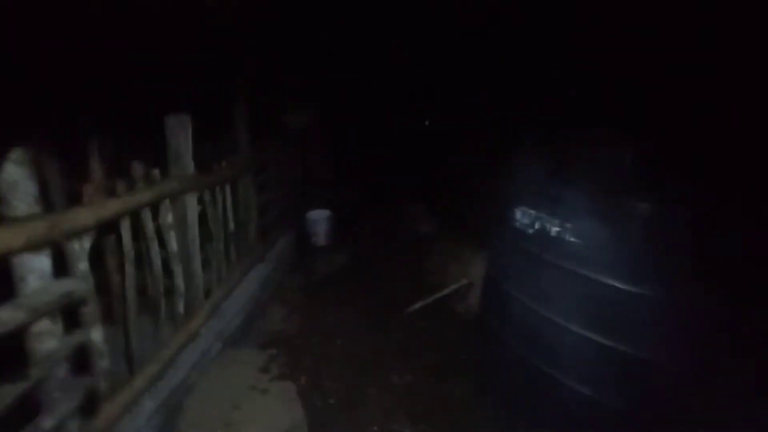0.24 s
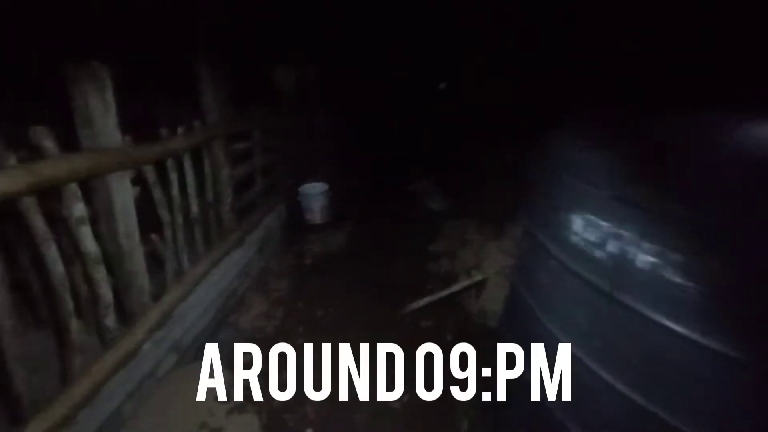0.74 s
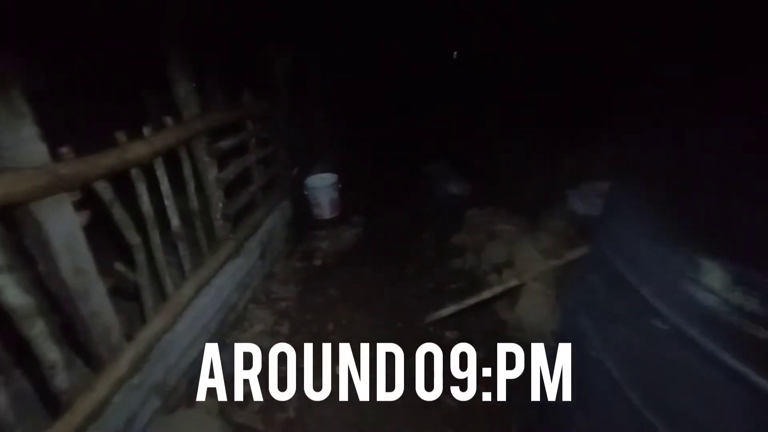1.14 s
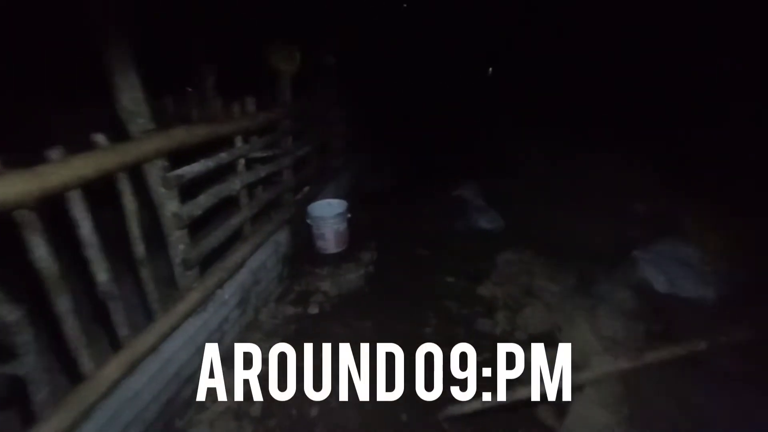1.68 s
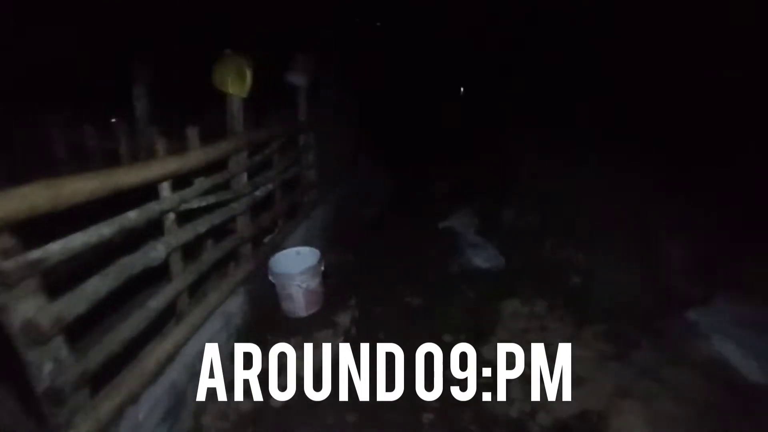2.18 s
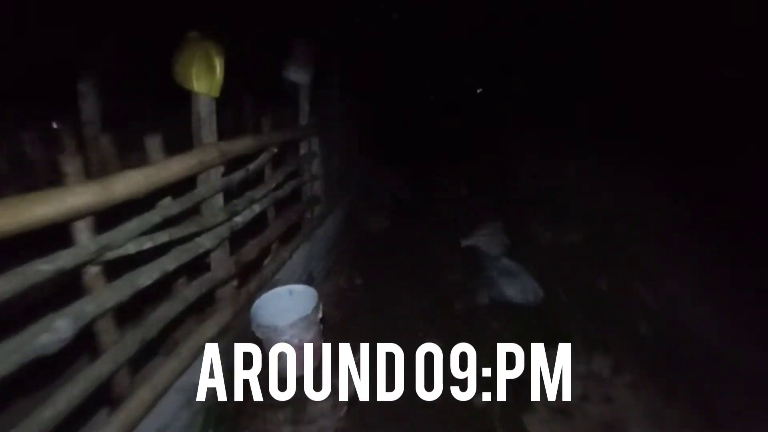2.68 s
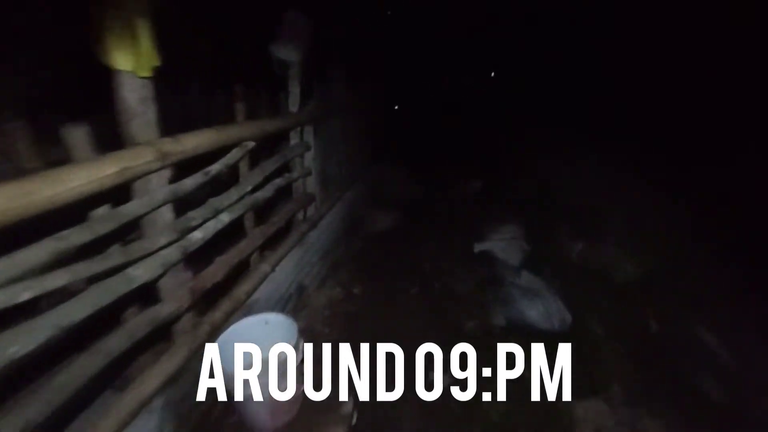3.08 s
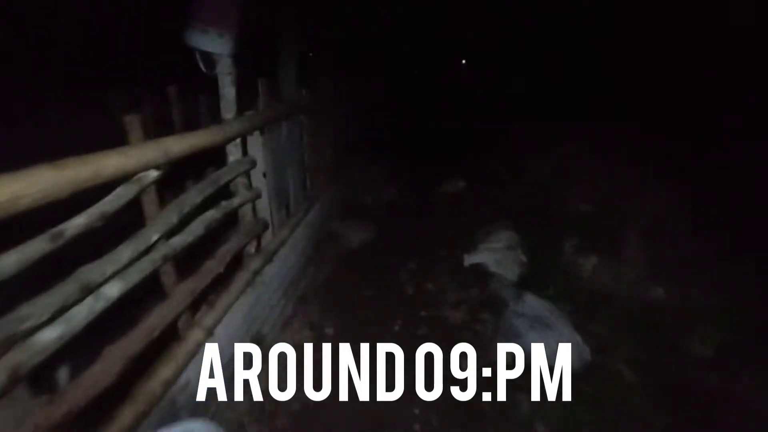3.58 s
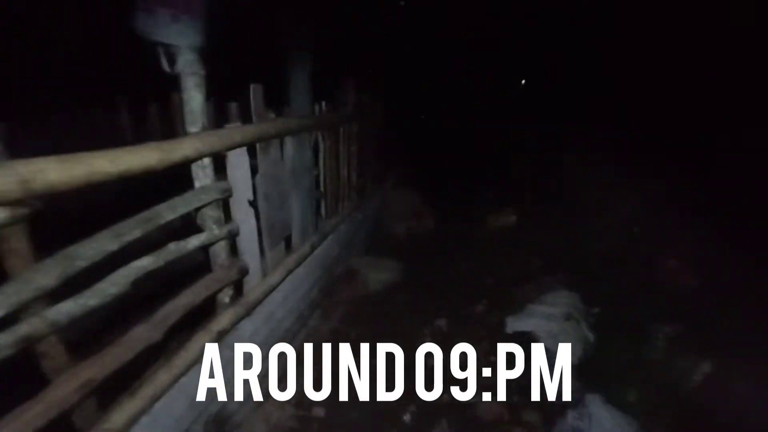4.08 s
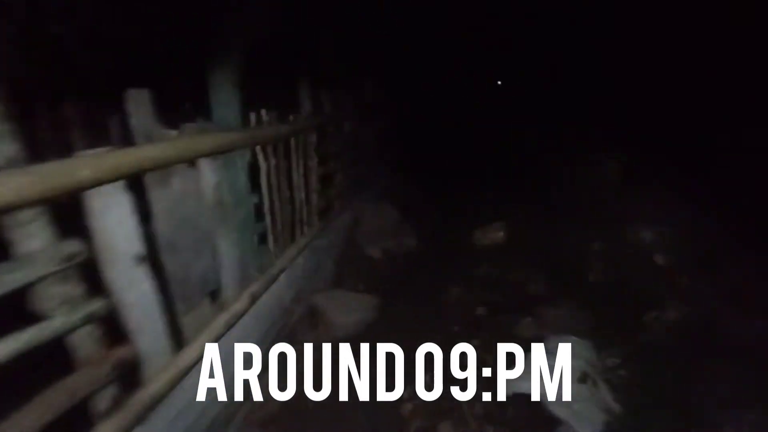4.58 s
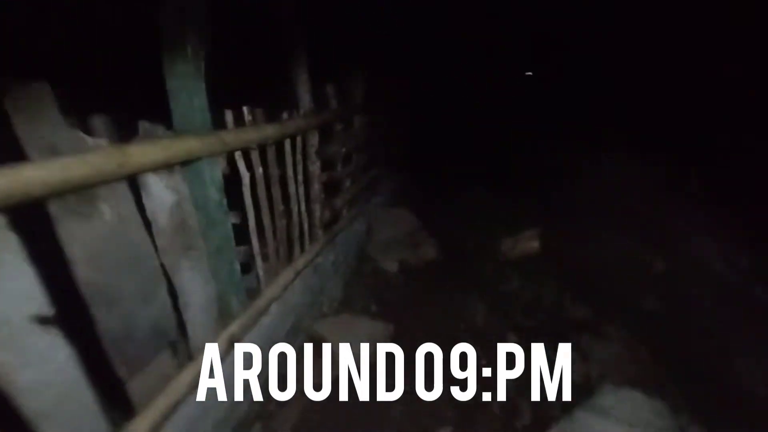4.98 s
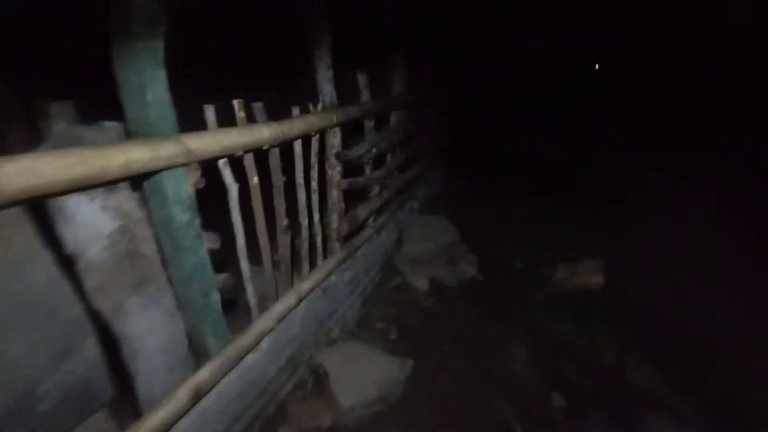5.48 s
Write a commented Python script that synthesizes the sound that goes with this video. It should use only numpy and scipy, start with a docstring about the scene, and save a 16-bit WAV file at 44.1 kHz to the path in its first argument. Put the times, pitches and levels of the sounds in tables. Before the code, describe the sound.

At night by a wooden pen, a pig snorts sharply and grunts at about one second, grunts again near 2.7, groans hoarsely at 3.3, then gives two stronger grunts near 3.8 and 4.9. Clicks and knocks crowd the first half while litter rustles. Crickets trill faintly throughout. Close handheld microphone, a very short echo.

```python
"""Sow in a night pen

A sow grunts, snorts and snuffles close up in a wooden pen, with crickets trilling all around.
Each grunt opens with a nasal hum, a wavering near-sine, and breaks into slow throat pulses: thumps and rasps
of noise through resonances. Puffs are noise ringing the snout; a hoarse groan is pulses half drowned in noise.
Knocks are short bursts on one ring, rustling litter is scattered pitched grains under a faint fizz of straw.
Crickets are blurred tones pulsed by wing strokes, over a bed of coloured noise."""
import sys
import numpy as np
from scipy import signal
from scipy.io import wavfile
from scipy.ndimage import uniform_filter1d

SR = 44100
rng = np.random.default_rng(int(sys.argv[2]) if len(sys.argv) > 2 else 0)


def materialize(psi):
    """Save the field psi as 16-bit PCM at rate SR to the path in sys.argv[1].

    A 1-D psi becomes a single channel; in a 2-D psi each row is a channel.
    """
    bounded = np.clip(np.atleast_2d(psi).T, -1, 1)
    quanta = np.round(bounded * 32767).astype(np.int16)
    wavfile.write(sys.argv[1], SR, quanta)


N = 253134
TIME = np.arange(N) / SR
FREQS = np.fft.rfftfreq(8192, 1 / SR)


def gain_of(db):
    """Decibels to amplitude."""
    return 10 ** (np.asarray(db) / 20)


def evened(x):
    """Scales to rms 1."""
    return x / np.sqrt(np.mean(x ** 2) + 1e-20)


def read(points, hz):
    """Reads a table on a log-frequency axis."""
    f, value = np.transpose(points)
    return np.interp(np.log(hz + 1), np.log(f + 1), value)


def follow(rows, t):
    """Reads every column of a curve at the times t."""
    s, *columns = np.transpose(rows)
    return [np.interp(t, s, c) for c in columns]


def add(mix, s, sound):
    """Mixes a sound in at s seconds."""
    part = mix[max(round(s * SR), 0):][:len(sound)]
    part += sound[:len(part)]


def wander(size, per_s):
    """Random drift of about unit size: straight lines between per_s random points a second."""
    return np.interp(np.arange(size) * per_s / SR, np.arange(4096), rng.standard_normal(4096))


def resonances(modes):
    """Gain of a set of resonances (f/Hz, width/Hz, level/dB), summed in power."""
    power = 0
    for hz, width, db in modes:
        # the factor makes width the span between the half-power points
        power = power + (gain_of(db) / (1 + ((FREQS - hz) / (.78 * width)) ** 2)) ** 2
    return np.sqrt(power)


def ring(x, gain):
    """Passes x through a causal, minimum-phase filter of this gain shape and unit energy."""
    log_gain = np.log(np.maximum(gain / gain.max(), 1e-5))
    mirrored = np.r_[log_gain, log_gain[-2:0:-1]]
    spectrum = np.exp(np.conj(signal.hilbert(mirrored)))
    response = np.fft.ifft(spectrum).real[:4096]
    return signal.fftconvolve(x, response / np.linalg.norm(response))[:len(x)]


def tilt(x, hz, kind):
    """A gentle low-pass or high-pass."""
    return signal.lfilter(*signal.butter(1, hz, kind, fs=SR), x)


def resonate(x, hz, width):
    """A resonance of gain 1 that follows the curve hz: shift down, smooth, shift back up."""
    turn = np.exp(2j * np.pi * np.cumsum(hz) / SR)
    r = np.exp(-np.pi * width / SR)
    smooth = signal.lfilter([(1 - r) ** 2], [1, -2 * r, r * r], x / turn)
    return 2 * (turn * smooth).real


# decay of the pen's echo: f/Hz, t60/s
PEN_DECAY = [(100, 0.23), (300, 0.23), (900, 0.23), (2000, 0.16), (6000, 0.13), (15000, 0.028)]


def pen(x, echo_db):
    """Rails and walls scatter the sound into a short tail that dies band by band."""
    t = np.arange(SR // 2) / SR
    scatter = rng.standard_normal(len(t)) * (t > .004)
    hz, s, z = signal.stft(scatter, SR, nperseg=256)
    z = z * gain_of(-60 * s / read(PEN_DECAY, hz)[:, None])
    tail = signal.istft(z, SR, nperseg=256)[1][:len(t)]
    return x + gain_of(echo_db) * signal.oaconvolve(x, tail / np.linalg.norm(tail))[:N]


def trill(hz, width_hz, strokes_per_s, depth):
    """Wing strokes pulse a narrow wing resonance; many scattered paths blur its pitch."""
    noise = rng.standard_normal(N) + 1j * rng.standard_normal(N)
    blur = signal.sosfilt(signal.butter(2, width_hz / 2, fs=SR, output="sos"), noise)
    blur = blur / np.sqrt(abs(blur) + 1e-12)  # evens out the swells
    stroke_rate = strokes_per_s * (1 + .06 * wander(N, 6.4))
    strokes = 1 + depth * np.cos(2 * np.pi * np.cumsum(stroke_rate) / SR)
    carrier = np.exp(2j * np.pi * np.cumsum(hz * np.ones(N)) / SR)
    return evened(strokes * (blur * carrier).real)


# colour of the far insects and air: f/Hz, level/dB
NIGHT_COLOUR = [(30, -26), (100, 20), (250, 18), (700, 1.5), (1800, -1), (3500, -6), (4400, 31.5),
                (5100, -67), (5800, -18.5), (6600, -32.5), (7300, -48.5), (8200, -11), (10000, -43),
                (14000, -17)]
CRICKET_HZ, CRICKET_DB = 4396, -63  # the steady crickets, before drift and swell
NEAR_HZ, NEAR_DB = 4195, -58  # the nearer cricket
FIRST_BOUT_S, BOUT_EVERY_S, BOUT_S = .76, 1.395, .42


def insects(night_db=-70, waver_db=2, swell_db=2):
    """Steady crickets, one that sings in regular bouts, a higher trill and the far chorus."""
    drift_hz, swells_per_s = 25, 6
    steady = gain_of(CRICKET_DB + swell_db * wander(N, swells_per_s))
    steady_hz = CRICKET_HZ + drift_hz * wander(N, swells_per_s)
    steady *= trill(steady_hz, width_hz=150, strokes_per_s=39, depth=.45)
    age = (TIME - FIRST_BOUT_S) % BOUT_EVERY_S
    bouts = gain_of(NEAR_DB) * np.clip(np.minimum(age, BOUT_S - age) / .025, 0, 1)  # 25 ms edges
    near = bouts * trill(NEAR_HZ, width_hz=120, strokes_per_s=57, depth=0.47)
    high = gain_of(-74 + waver_db * wander(N, 14))
    high = high * trill(6500, width_hz=480, strokes_per_s=48, depth=.3)
    night = gain_of(night_db) * ring(rng.standard_normal(N), gain_of(read(NIGHT_COLOUR, FREQS)))
    return steady + near + high + night


# scuffs in the litter: crest t/s, rise t/s, fall t/s, crackle level/dB, dry straw fizz level/dB
SCUFF_CUES = [ (.02, 0.035, 0.11, -53, -70), (.4, 0.089, 0.051, -53, -71), (.69, .22, 0.33, -55, -67.5),
              (.89, 0.094, 0.53, -55.5, -70.5), (1.2, 0.28, 0.18, -51.5, -69.5),
              (1.51, 0.36, 0.12, -61.5, -74), (1.73, 0.053, 0.12, -64, -72.5),
              (1.941, 0.065, .12, -56.5, -67), (2.38, 0.046, .15, -62.5, -79),
              (2.57, 0.093, 0.18, -55, -79), (2.83, .15, 0.24, -52, -69),
              (3.069, 0.071, 0.11, -60.5, -70.5), (3.273, .015, 0.025, -62, -80),
              (3.46, .04, 0.4, -63.5, -87), (4.048, .05, 0.17, -56, -77), (4.83, 0.046, 0.047, -44, -67),
              (5.3, 0.035, 0.43, -63.5, -67), (5.55, 0.055, 0.33, -60.5, -88)]
SCUFF_DROP_DB = -18  # level at the start of the rise and at the end of the fall
CRACKLE_FLOOR_DB, FIZZ_FLOOR_DB = -74, -84.5  # the litter is never quite still


def stirring():
    """How strongly the litter crackles and fizzes: every scuff swells and dies away over a faint floor."""
    crackle, fizz = gain_of(CRACKLE_FLOOR_DB), gain_of(FIZZ_FLOOR_DB)
    for crest, rise, fall, crackle_db, fizz_db in SCUFF_CUES:
        away = np.where(TIME < crest, (crest - TIME) / rise, (TIME - crest) / fall)
        swell = gain_of(SCUFF_DROP_DB * (away + away ** 2) / 2)
        crackle = np.maximum(crackle, gain_of(crackle_db) * swell)
        fizz = np.maximum(fizz, gain_of(fizz_db) * swell)
    return crackle, fizz


# colour of the crackling litter: f/Hz, level/dB
LITTER_COLOUR = [(800, -13.5), (1600, 0), (2500, -2), (3600, -1), (5000, -14), (6200, -6), (7000, -22)]


def rustle(clump_db=3, grain_width_hz=420):
    """Bits of litter crackle in clumps, each with one of sixteen pitches."""
    crackle = np.zeros(N)
    grains_per_s, spread_db, chip_s = 36, 3.5, .004  # grain rate per pitch
    age = np.arange(SR // 60) / SR
    for hz in np.linspace(800, 7000, num=16):
        hits = rng.random(N) < grains_per_s / SR
        hit_db = spread_db * np.minimum(rng.exponential(1, N), 3) + clump_db * wander(N, 22)
        grains = hits * gain_of(hit_db) * rng.choice([-1, 1], N)
        burst = rng.standard_normal(len(age)) * np.exp(-age / chip_s)
        chip = resonate(burst, np.full(len(age), hz), grain_width_hz)
        crackle += gain_of(read(LITTER_COLOUR, hz)) * signal.oaconvolve(grains, evened(chip))[:N]
    return evened(crackle)


# colour of the dry straw: f/Hz, level/dB
STRAW_TONE = [(2000, -28.5), (4000, 2.5), (5800, -4.5), (7200, -9.5), (8200, -3.5), (10000, -22),
              (11500, -16), (13000, -1.5), (15500, -9)]


def straw(clump_db=2):
    """A faint high fizz of dry straw: coloured noise with a quick flicker in level."""
    fizz = rng.standard_normal(N) * gain_of(clump_db * wander(N, 170))
    return ring(fizz, gain_of(read(STRAW_TONE, FREQS)))


# small knocks and clicks: t/s, level/dB, ring f/Hz, scrape t60/s
KNOCK_CUES = [ (.038, -36, 2900, .019), (.158, -44, 2500, 0.064), (.209, -39.5, 2960, 0.019),
              (0.4321, -32, 4000, 0.071), (0.44, -47, 3660, 0.038), (0.6874, -34.5, 1980, 0.055),
              (0.7217, -30, 3000, .016), (.888, -45, 3360, .037), (1.411, -51.5, 1700, 0.13),
              (1.487, -39.5, 3000, 0.017), (1.58, -56, 3370, 0.18), (1.711, -47.5, 1600, 0.061),
              (1.842, -57, 1850, .08), (1.953, -39, 2690, 0.019), (2.054, -47, 1600, 0.027),
              (2.3633, -40.5, 3840, 0.018), (2.377, -37, 1750, 0.067), (2.5345, -34, 1830, 0.031),
              (2.7037, -40, 1600, 0.088), (3.093, -45, 3270, 0.075), (4.293, -50.5, 2000, 0.022),
              (4.829, -39, 3150, .04), (5.48, -53, 1720, 0.21), (5.547, -50.5, 3020, 0.054)]
# broad body under every knock: f/Hz, level/dB
KNOCK_COLOUR = [(100, -24.5), (600, -30.5), (1100, -5), (2000, 3), (3300, 3), (4800, -5), (6300, -3.5),
                (8000, -39), (10500, -32.5), (14000, -24.5)]


def knock(s, db, hz, t60, ring_db=8, width_hz=380, snap=5):
    """A sharp contact and a brief scrape ring one main resonance over a broad body."""
    t = np.arange(SR // 4) / SR
    contact = rng.standard_normal(len(t)) * gain_of(-60 * t / t60)
    contact[0] += snap
    body = gain_of(read(KNOCK_COLOUR, FREQS)) * (0.5 + resonances([(hz, width_hz, ring_db)]))
    return s, gain_of(db) * ring(contact, body)


# puffs of air through the snout: t/s, rise t/s, fall t/s, level/dB, lowest resonance f/Hz,
# upper resonances level/dB, breathy hiss level/dB
PUFF_CUES = [ (0.041, 0.026, 0.21, -53, 496, -20, -51), (.087, 0.051, 0.32, -50.5, 1070, 8, -25),
             (0.268, 0.12, 0.21, -51, 522, -5.5, -21), (0.489, 0.086, 0.28, -49, 870, -1, -29),
             (.707, 0.054, 0.055, -38.5, 540, 5, -17), (.759, .012, 0.038, -25.5, 544, 8, 4.5),
             (2.098, 0.069, 0.089, -43, 814, -1.5, -24.5), (2.472, 0.065, 0.37, -52, 1550, -10, -42),
             (3.991, 0.046, 0.13, -39.5, 900, 6.5, 1), (4.03, 0.16, 0.061, -46.5, 755, -1, -15.5),
             (4.711, 0.069, 0.38, -44, 750, -5.5, -20), (5.093, 0.0038, 0.05, -45, 570, -5, -19.5),
             (5.253, 0.072, 0.16, -44.5, 787, -3, -16), (5.612, 0.087, 0.51, -46, 554, 3, -23.5)]
# upper resonances of the snout: f/Hz, width/Hz, level/dB
UPPER_SNOUT = [(1156, 236, -1.5), (1700, 760, -7)]
# colour of the breathy hiss: f/Hz, level/dB
HISS_COLOUR = [(60, -17), (220, 8), (500, -4), (1000, -10.5), (2800, 0.5), (4500, -4.5), (6200, 1),
               (7500, -16), (10500, -32.5), (13500, -21.5), (15500, -24.5)]
NOSE_WIDTH_HZ = 150  # width of the lowest resonance


def puff(start, rise, fall, db, low_hz, upper_db, hiss_db, onset_db=-12, fade_db=-20, flutter_db=2.0):
    """Turbulent air rings the snout and hisses at the wet nostrils; a tight, toneful puff also throbs."""
    t = np.arange(0, rise + fall, 1 / SR)
    throb_db, throbs_per_s = 4, 55  # an irregular throb, scaled by tightness
    lowest = resonances([(low_hz, NOSE_WIDTH_HZ, 0)])
    snout = np.hypot(lowest, gain_of(upper_db) * resonances(UPPER_SNOUT))
    snout *= FREQS ** 4 / (FREQS ** 4 + (low_hz / 2) ** 4 + 1)  # thins out the bass
    tightness = 1 / (1 + 2 * gain_of(upper_db) + 10 * gain_of(hiss_db))
    air = rng.standard_normal(SR)[:len(t)]
    unrest_db = flutter_db * wander(len(t), 220) + tightness * throb_db * wander(len(t), throbs_per_s)
    colour = np.hypot(snout, gain_of(hiss_db + read(HISS_COLOUR, FREQS)))
    air = evened(ring(air * gain_of(unrest_db), colour))
    swell_db = np.interp(t, [0, rise, rise + fall], [onset_db, 0, fade_db])
    return start, air * gain_of(db + swell_db) * signal.windows.tukey(len(t), .1)


# nasal hums: t/s, length t/s, first pitch f/Hz, last pitch f/Hz, level/dB, level change over the length/dB
HUM_CUES = [(0.71, 0.059, 389, 320, -47, 4), (0.756, 0.044, 221.6, 203, -29.5, -9),
            (.946, 0.094, 296, 332, -42, 4), (2.703, 0.075, 298, 304, -43.5, -3),
            (3.77, .1, 310, 323.2, -34.5, -1), (4.909, 0.052, 235, 243, -40, -5.5),
            (4.969, 0.088, 320.2, 337, -35.5, -2.5)]
HUM_EDGE_S = 0.01  # attack and release of a hum


def hum(start, length, first_hz, last_hz, db, fade_db, second_db=-21, third_db=-17):
    """A nearly pure, unsteady tone through the nose, with faint second and third harmonics."""
    t = np.arange(0, length, 1 / SR)
    jitter, flutter = .03, .2  # shares of pitch and of level
    hz = first_hz + (last_hz - first_hz) * t / length
    phase = 2 * np.pi * np.cumsum(hz * (1 + jitter * wander(len(t), 280))) / SR
    tone = np.sin(phase) + gain_of(second_db) * np.sin(2 * phase) + gain_of(third_db) * np.sin(3 * phase)
    edges = np.minimum(np.minimum(t, length - t) / HUM_EDGE_S, 1)
    envelope = edges * gain_of(db + fade_db * t / length)
    return start, evened(tone) * envelope * (1 + flutter * wander(len(t), 130))


LEAD_IN_PER_S = 65  # pulse rate of the lead-in, before rounding to whole pulses
CATCH_DB, ARCH_DB = -4, -2.5  # end of the lead-in; both ends of the rattle against its middle


def pulses(start, full, last, per_s, slowing, db, lead_db):
    """Times and levels of a grunt's pulses: a lead-in that swells, then a rattle that arches and drifts in pace."""
    lead_count = max(round((full - start) * LEAD_IN_PER_S), 1)
    lead = np.linspace(0, 1, lead_count, endpoint=False)
    u = np.linspace(0, 1, max(round((last - full) * per_s), 1) + 1)
    rattle_times = full + (last - full) * (u - slowing * u * (1 - u))
    times = np.r_[start + (full - start) * lead, rattle_times]
    levels = np.r_[lead_db + (CATCH_DB - lead_db) * lead, ARCH_DB * (2 * u - 1) ** 2]
    return zip(times, db + levels)


# grunts, a loose lead-in and then a full rattle: start t/s, full voice t/s, last pulse t/s, pulses per s,
# slowing share, rasp rise t/s, pen echo level/dB, level/dB, lead-in level/dB, low thump level/dB
GRUNT_CUES = [ (.982, 1.0495, 1.103, 57, 0, .0013, -9, -30, -12, -2.5),
              (2.7255, 2.7665, 2.876, 55, 0, .0003, -9, -32, -12, -4),
              (3.7895, 3.8315, 3.9615, 62, .077, .0003, -17, -25.5, -9, -1.5),
              (4.917, 4.967, 5.043, 66, -.09, .0008, -14, -24.5, -20.5, 1)]
# the throat's resonances, one list per grunt: f/Hz, width/Hz, level/dB
THROAT_MODES = [
    [(169, 133, -1.5), (900, 180, -10.5), (1400, 620, -13.5), (2000, 194, -1), (2530, 930, -10.5),
     (3570, 830, -14.5), (4230, 460, -25.5), (6350, 320, -14.5)],
    [(202, 150, 2), (930, 240, -6), (1600, 1300, -10), (2100, 470, -2.5), (2500, 250, 0), (3000, 120, -1.5),
     (3670, 590, -8.5), (6470, 390, -19.5)],
    [(300, 78, 2.5), (149, 420, -4), (900, 43, -19), (1414, 94, -12.5), (2017, 136, 3), (2500, 650, -8.5),
     (3686, 430, -7), (4200, 260, -19), (6580, 660, -43.5)],
    [(220, 104, 4), (830, 100, -22.5), (1300, 300, -4), (1847, 165, 4), (2330, 114, 2), (2960, 440, -7.5),
     (4360, 520, -36.5), (6600, 100, -22.5)],
]
RASP_DECAY_S = .0045


def grunt(row, throat, dull_hz=2400, dull_s=0.0061, rasp_hz=550, tick_db=-48):
    """Slack folds slap shut some sixty times a second: each slap is a thump and a rasp of air that dulls as it dies."""
    leak, leak_s, alike, uneven_db, tick_spread_db = .17, .014, .55, 1, 4
    start, full, last, per_s, slowing, rise_s, echo_db, db, lead_db, thump_db = row
    age, source = np.arange(SR // 20) / SR, np.zeros(N)
    impulse = 1. * (age == 0)
    opening = (1 - np.exp(-age / rise_s)) * (np.exp(-age / RASP_DECAY_S) + leak * np.exp(-age / leak_s))
    thump = gain_of(thump_db) * tilt(impulse, rasp_hz, "low")
    # the snout radiates little deep bass or top
    colour = resonances(throat) * FREQS ** 2 / (FREQS ** 2 + 100 ** 2) / (1 + (FREQS / 7200) ** 10)
    habit, fresh = rng.standard_normal(len(age)), np.exp(-age / dull_s)
    for at, effort_db in pulses(start, full, last, per_s, slowing, db, lead_db):
        # slaps of one grunt resemble each other
        air = alike * habit + np.sqrt(1 - alike ** 2) * rng.standard_normal(len(age))
        air = opening * (fresh * air + (1 - fresh) * tilt(air, dull_hz, "low"))
        rasp = tilt(air / np.linalg.norm(air), rasp_hz, "high")
        slap = ring(thump + rasp, colour)
        # faint sharp tick at the start of each pulse, uneven in level
        tick = gain_of(tick_db + tick_spread_db * rng.standard_normal()) * impulse
        slap = slap / np.linalg.norm(slap) + tick
        slap_db = effort_db + uneven_db * rng.standard_normal()
        add(source, at, slap * gain_of(slap_db) * np.sqrt(SR / per_s))
    return pen(source, echo_db)


# swells of a higher, hoarse groan: t/s, rise t/s, level/dB, fade dB/s
GROAN_SWELLS = [(3.302, 0.027, -37, 176), (3.362, 0.012, -34, 134), (3.514, 0.013, -40.5, 84.5)]
# the moving throat: t/s, first resonance f/Hz, second resonance f/Hz
MOUTH_MOVES = [(3.31, 620, 1800), (3.38, 754, 1850), (3.49, 620, 1720), (3.55, 720, 1570),
               (3.72, 775, 1600)]
GROAN_END_S = 3.76
GROAN_HZ, GROAN_SETTLED_HZ, GROAN_SAG_S = 319, 263.7, .06  # the pitch sags as the air runs out


def groan(jitter=0.027, low_width_hz=340, high_width_hz=260, high_db=-13, cut_hz=450):
    """Unsteady pulses, half drowned in air, pass two moving throat resonances; each swell rises fast and fades."""
    rough, waver, flutter_db = .48, .03, 2
    t = np.arange(GROAN_SWELLS[0][0], GROAN_END_S, 1 / SR)
    hz = GROAN_SETTLED_HZ + (GROAN_HZ - GROAN_SETTLED_HZ) * np.exp(-(t - t[0]) / GROAN_SAG_S)
    swells = []
    for s, rise, db, fade in GROAN_SWELLS:
        swells.append(np.clip((t - s) / rise, 0, 1) ** 2 * gain_of(db - fade * (t - s - rise)))
    effort = np.linalg.norm(swells, axis=0)
    low_hz, high_hz = follow(MOUTH_MOVES, t)
    unsteady_hz = hz * (1 + jitter * wander(len(t), 153.5) + waver * wander(len(t), 30))
    phase = 2 * np.pi * np.cumsum(unsteady_hz) / SR
    folds = sum(np.cos(k * phase) for k in range(1, 10)) * 2 * np.sqrt(hz / SR)
    drive = (1 - rough) * folds + rough * rng.standard_normal(SR)[:len(t)]
    voice = resonate(drive, low_hz, low_width_hz) + gain_of(high_db) * resonate(drive, high_hz, high_width_hz)
    voice = signal.sosfilt(signal.butter(4, [cut_hz, 2300], "band", fs=SR, output="sos"), voice)
    voice = voice / np.sqrt(uniform_filter1d(voice ** 2, size=900) + 1e-12)  # evens the running level
    return t[0], effort * gain_of(flutter_db * wander(len(t), 200)) * voice


def scene():
    """The sow and the knocks and litter in the pen, with the insects around."""
    snout, knocks = np.zeros((2, N))
    grunts = sum(grunt(row, throat) for row, throat in zip(GRUNT_CUES, THROAT_MODES))
    add(snout, *groan())
    for row in HUM_CUES:
        add(snout, *hum(*row))
    for row in PUFF_CUES:
        add(snout, *puff(*row))
    for row in KNOCK_CUES:
        add(knocks, *knock(*row))
    crackle, fizz = stirring()
    sow = grunts + pen(snout, echo_db=-15.5)
    floor = pen(knocks + crackle * rustle(), echo_db=-10) + fizz * straw()
    return (sow + floor + insects())[None]


EDGE_HZ = 15700


def record(dry):
    """The recorder's band limit: a steep low-pass."""
    low_pass = signal.firwin(511, EDGE_HZ, window=("kaiser", 9), fs=SR)
    return signal.oaconvolve(dry, low_pass[None], "same")


dry = scene()
out = record(dry)
materialize(out)
```